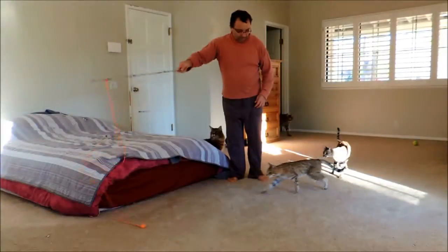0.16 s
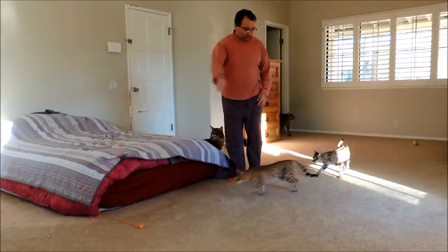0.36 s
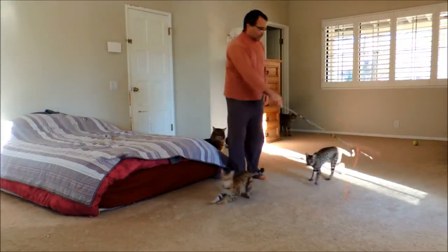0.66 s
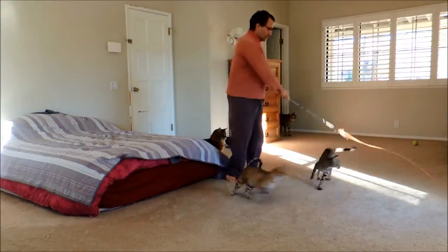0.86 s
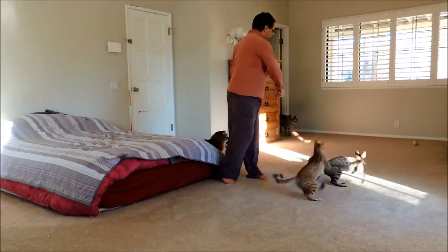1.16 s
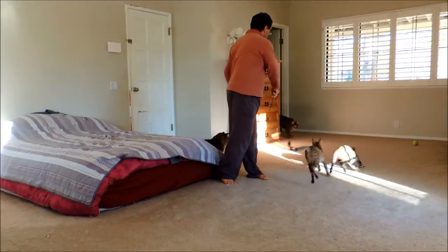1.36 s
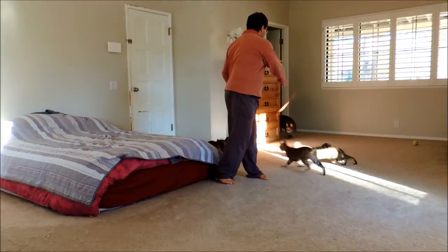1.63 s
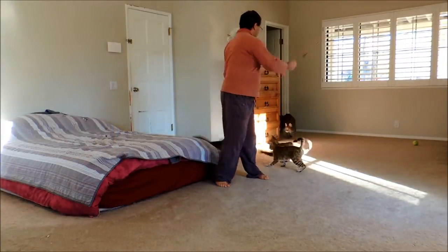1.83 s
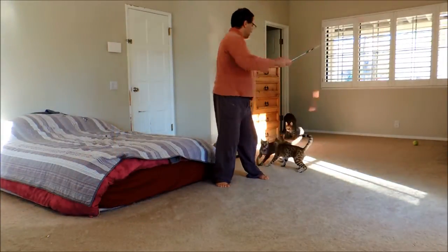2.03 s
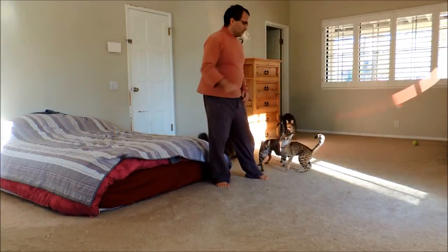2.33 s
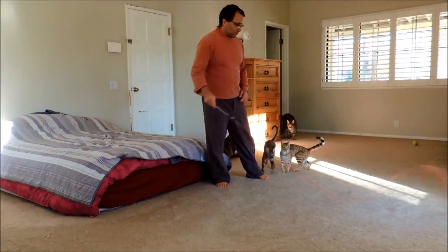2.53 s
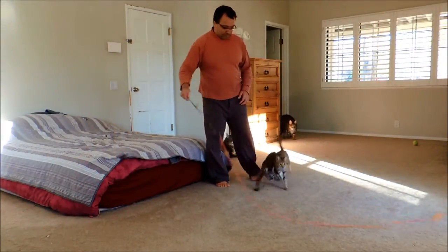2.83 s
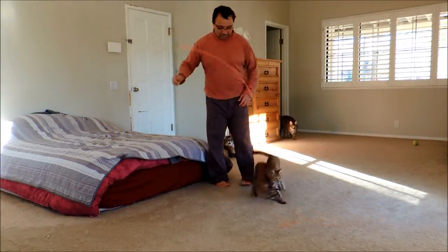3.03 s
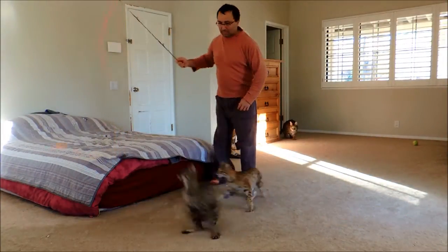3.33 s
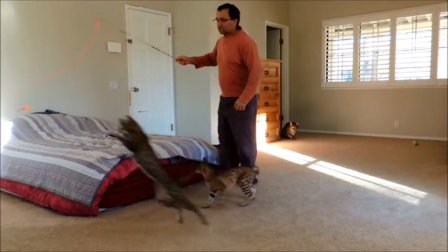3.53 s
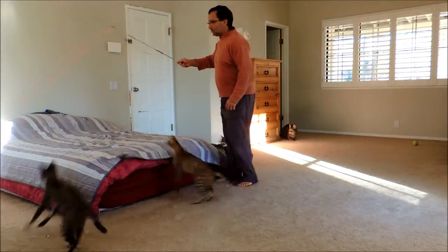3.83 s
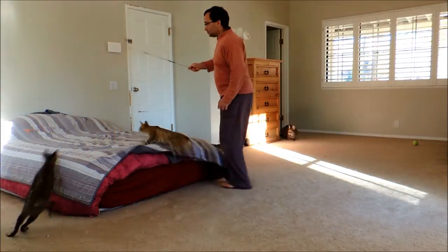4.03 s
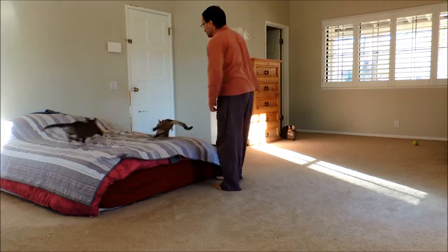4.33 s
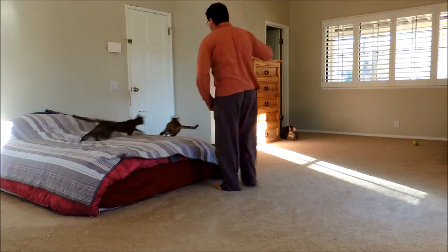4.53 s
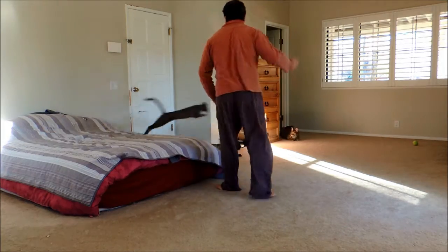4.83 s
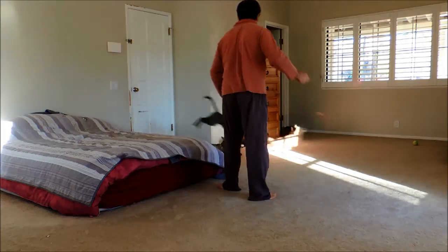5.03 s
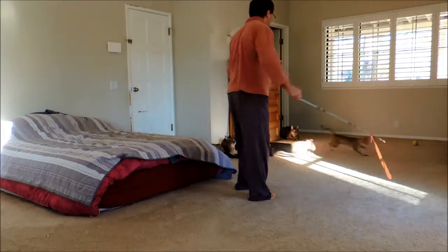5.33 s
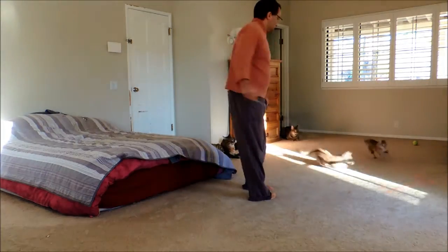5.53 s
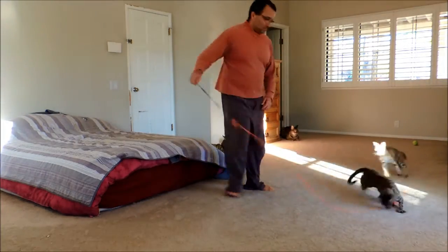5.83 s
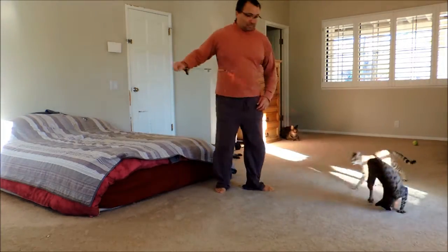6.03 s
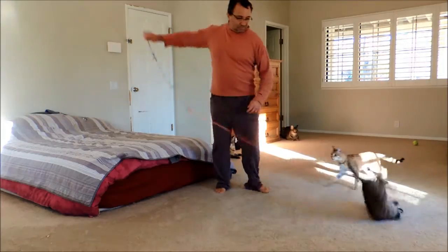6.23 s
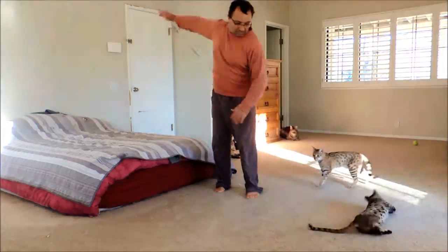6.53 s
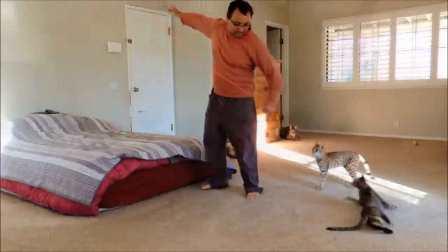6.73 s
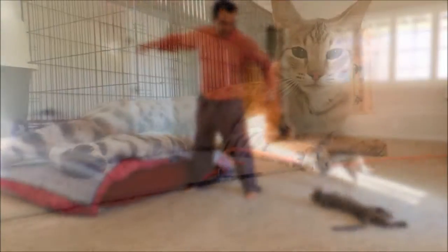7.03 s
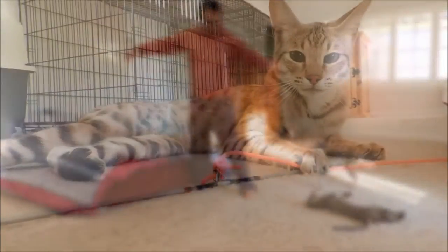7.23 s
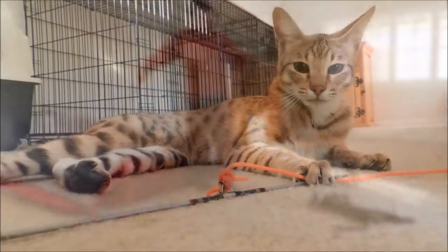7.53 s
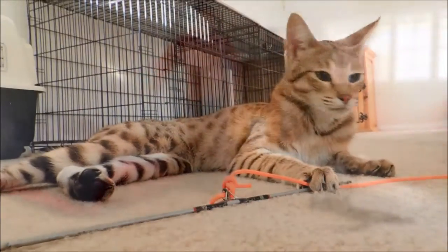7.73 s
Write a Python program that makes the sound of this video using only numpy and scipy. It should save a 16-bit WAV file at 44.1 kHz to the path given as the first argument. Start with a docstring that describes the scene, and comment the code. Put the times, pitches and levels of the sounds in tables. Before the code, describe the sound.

Muffled paw thuds, quick claw scratches and low mattress bumps as cats chase a toy around a bare-walled, hissy room.

```python
"""Cats chase a toy across a carpeted bedroom, some metres from a small stereo camera that hisses throughout.
Soft paw thumps on the wooden floor grow firmer near 0.9 s; claws tick, threads twang, claws and fur scuff the pile.
After a lull at 2 s the chase returns; from 4.2 s a mattress booms under pushes and drops. The hardest thump is at
5.1 s, the strongest scuff near 5.9 s; treble hiss swells at 6.8 s and a few last steps follow. Short ringing bursts
make thumps, twangs, claw drags and mattress drops; shaped noise makes ticks, grit, rustle, pushes and hiss;
bare walls echo paws, claws and scuffs."""
import sys
import numpy as np
from scipy import signal
from scipy.fft import rfft, irfft, next_fast_len
from scipy.io import wavfile

SR = 44100
rng = np.random.default_rng(int(sys.argv[2]) if len(sys.argv) > 2 else 0)


def generate_wav(sig):
    """Save sig (samples, or channels by samples) to the path in sys.argv[1] as 16-bit PCM at SR."""
    pcm = np.round(np.clip(np.atleast_2d(sig).T, -1, 1) * 32767).astype(np.int16)
    wavfile.write(sys.argv[1], SR, pcm)


N = 347528  # length in samples


def paws():
    """Each padded paw makes the boards ring for a few cycles; weight adds a deep boom, toes add small knocks."""
    # paw landings, levels before panning and echo: start_s, peak_db, floor_pitch_hz,
    # knock_db and boom_db (both relative to the thump), ring_cycles
    landings = [(0.292, -47, 172, -22, -17, 1.9), (0.486, -47, 186, -3, -19, 1.2),
                (0.582, -48, 194, -4.5, -18, 2.1), (0.64, -48.5, 199, -5, -24, 2.4),
                (0.669, -48, 188, 0, -18, 2), (0.745, -48, 196, -4, -14, 1.9),
                (0.914, -36.5, 294, -9, -24, 1.65), (0.929, -39.5, 395, -19, -23, 2.5),
                (1.11, -45, 198, -6, -20, 1.9), (1.175, -35, 211, -10, -28, 1.8),
                (1.259, -36, 210, -9, -6, 1.5), (1.331, -39.5, 249, -8, -20, 2),
                (1.358, -42.5, 230, -14, -18, 1.7), (1.476, -37.5, 227, -16, -24, 2.2),
                (1.51, -37.5, 223, -10, -9, 1.7), (1.587, -34, 204, -9.5, -16, 1.2),
                (1.639, -37, 222, -6, -10, 1.5), (1.788, -36.5, 272, -12, -17, 2.5),
                (1.871, -45, 218, -7, 4, 1.9), (1.908, -23, 272, -11, -12, 1.76),
                (1.939, -30, 213, -12, -19, 1.3), (1.962, -35.5, 196, -17, -17, 2.1),
                (2.009, -55, 215, -14, -22, 2.1), (2.678, -28.5, 292, -11, -25, 1.3),
                (2.736, -30.5, 278, -12, -34, 1), (2.958, -42, 219.4, -17, -9, 1.9),
                (3.007, -34, 236, -7, -5.5, 1), (3.116, -27, 247, -12, -17, 1.2),
                (3.15, -36, 202, -15, -22, 2.2), (3.189, -22.5, 200, -12, -22, 1.25),
                (3.22, -28.5, 230, -9, -16, 1.2), (3.242, -25.5, 233, -17, -15, 1.3),
                (3.306, -28.5, 306, -9, -24, 2.9), (3.332, -37.5, 221, -20, -24, 2.6),
                (3.44, -31, 306, -8, -33, 2.2), (3.92, -43, 216, -10, -19, 3.1),
                (3.948, -27.5, 300, -18, -29, 1.6), (3.976, -30.5, 224, -5, -22, 1.8),
                (4.03, -34.5, 270, -11, -6, 2.3), (4.071, -37.5, 207, -7, -5.5, 1.7),
                (4.137, -35.5, 151, -6, -14, 1.8), (4.267, -44.5, 199, 1, -8, 1.2),
                (4.402, -34.5, 190, -5.5, -19, 2.2), (4.434, -33, 228, -4.5, -12, 2.4),
                (4.464, -37, 284, -6, -11, 1.4), (4.537, -38.5, 274, -4, -12, 1.7),
                (4.619, -39, 234, -4, -11, 1.9), (4.699, -34, 203, -1, -6, 1.75),
                (5.053, -33.5, 253, -14, -22, 3.5), (5.086, -14.5, 262, -15.5, -39, 2),
                (5.103, -24.5, 214, -11, -34, 3.1), (5.135, -27.5, 352, -11, -19, 2.2),
                (5.189, -31.5, 221, -25, -25, 2.4), (5.366, -36, 234, -10, -30, 2.5),
                (5.518, -35, 225, -11, -9.5, 2.2), (5.619, -36, 250, -7, -22, 2),
                (5.641, -30.5, 240, -4.5, -15, 1.5), (5.75, -27.5, 209, -5.5, -25, 1.9),
                (5.772, -25.5, 226, -13, -25, 1.5), (5.829, -27, 198, -3, -9, 3.1),
                (5.869, -21, 301, -7, -24, 2.2), (5.885, -21, 372, -15, -25, 2),
                (5.901, -25.5, 370, -13, -10.5, 1.4), (5.947, -24.5, 354, -8, -21, 1.5),
                (6.015, -27.5, 342, -20, -24, 0.91), (6.058, -40, 231, -18, -20, 1.7),
                (6.089, -42.5, 196, -15, -17, 1.5), (6.425, -40.5, 199, 0, -12, 1.7),
                (6.579, -43, 388, -13, -14, 1.3), (6.851, -29, 207, -14, -19, 1.44),
                (6.894, -36.5, 190, -6, -8, 1.7), (7.084, -43, 186, -12, -20, 1.7),
                (7.645, -40, 312, -19, -25, 1.6), (7.677, -43, 395, -17, -16, 2.3),
                (7.783, -40.5, 258, -6.5, -25, 1.9)]
    out = np.zeros(N)
    chances = rng.random((len(landings), 14))
    for (start_s, db, hz, knock_db, boom_db, cycles), chance in zip(landings, chances):
        thump = burst(hz, max(cycles, 0.7), phase=chance[0], rise=0.21)
        add(out, start_s, undb(db) * thump)
        boom = burst(126.0, cycles=1.3, phase=chance[1])
        add(out, start_s, undb(db + boom_db) * boom)
        # four toe knocks, 300 to 514 Hz, weaker the later they come
        for late, size, phase in chance[2:].reshape(4, 3):
            knock = np.exp(-1.2 * late) * burst(300 * 1.714 ** size, cycles=2.7, phase=phase, rise=0.39)
            add(out, start_s + 0.0019 + 0.025 * late, undb(db + knock_db) * knock)
    return side_gains(np.arange(N) / SR) * out


def ticks():
    """A claw snaps free or scratches: fading noise rings a fibre, giving a gritty click."""
    # claw ticks and sudden scratches, levels before panning:
    # start_s, peak_db, pitch_hz, fade_s (of the noise), left_minus_right_db
    claw_ticks = [(1.267, -35.5, 3200, 0.004, .5), (1.643, -37, 2650, 0.0029, -9),
                  (3.236, -33, 2580, 0.012, -3), (4.291, -38, 3830, .005, .5),
                  (4.563, -37, 3020, 0.0056, -1), (5.622, -41, 2450, 0.0065, -1),
                  (5.645, -46, 2830, .005, -2), (5.879, -19.5, 4600, 0.0022, -5),
                  (6.474, -30.5, 5300, .005, -4), (6.587, -34.5, 2690, 0.0023, -7),
                  (6.646, -33.5, 5300, 0.097, 6), (7.476, -38, 8000, .004, 11),
                  (7.483, -35, 6500, 0.0047, 12), (7.599, -39, 5920, .003, 9)]
    out = np.zeros((2, N))
    t = np.arange(SR // 8) / SR
    noises = rng.standard_normal((len(claw_ticks), len(t)))
    for (start_s, db, hz, fade_s, left_right_db), noise in zip(claw_ticks, noises):
        fibre = signal.iirpeak(hz, 0.7, SR)
        snap = signal.lfilter(*fibre, noise * np.exp(-t / fade_s))
        snap = signal.lfilter(*fibre, snap)  # a second pass narrows the pitch
        snap = undb(db) * snap / np.abs(snap).max()
        add(out, start_s, np.outer(pan(left_right_db), snap))
    return out


def twangs():
    """A claw catches a thread or the toy's cord, which rings on for a few cycles."""
    # caught threads, levels before panning: start_s, peak_db, pitch_hz
    caught_threads = [(1.269, -38, 1260), (1.272, -43, 1620), (1.603, -36.5, 950), (1.643, -45, 1360),
                      (1.646, -41, 2600), (1.659, -37, 780), (1.69, -42, 1290), (1.914, -37.5, 783),
                      (1.956, -44, 1720), (2.683, -40, 576), (2.685, -53, 1100), (3.197, -36.5, 604),
                      (3.241, -36, 1020), (3.245, -39, 1790), (4.026, -39, 1030), (4.556, -41, 1130),
                      (5.088, -38, 622), (5.62, -44, 1320), (5.648, -37, 1290), (5.852, -30, 1026),
                      (5.864, -23, 1036), (5.893, -34, 1260), (6.453, -40, 1960), (6.692, -39, 2700),
                      (6.956, -37.5, 1520)]
    out = np.zeros((2, N))
    for (start_s, db, hz), phase in zip(caught_threads, rng.random(len(caught_threads))):
        twang = undb(db) * burst(hz, cycles=7.2, phase=phase, rise=0.04)
        add(out, start_s, np.outer(side_gains(start_s), twang))
    return out


def scuffs():
    """Claws pluck carpet loops in short pitched grains; pile and fur crackle densely above them."""
    # slides on carpet and blanket, levels before panning: centre_s, swell_s, fade_s,
    # drag_db (claws), drag_pitch_hz, grit_db (pile), rustle_db (fur)
    slides = [(.57, .08, 0.12, -64, 850, -59, -62), (1.268, 0.0087, 0.06, -51, 1190, -63, -53),
              (1.575, 0.016, 0.061, -49, 1050, -52.5, -56), (1.644, 0.014, 0.043, -42, 845, -45, -47),
              (1.912, 0.011, .02, -46.5, 820, -52, -58), (1.965, 0.017, 0.042, -51.5, 870, -56.5, -65),
              (2.06, .05, 0.058, -75, 850, -67, -54), (2.46, 0.045, 0.064, -89, 1040, -64, -60),
              (2.685, 0.0034, .025, -49, 710, -67, -68), (2.745, 0.016, 0.049, -50.5, 636, -63, -69),
              (2.92, 0.067, 0.085, -61.5, 1060, -62, -56.5), (3.14, 0.016, 0.067, -58, 700, -58.5, -68),
              (3.241, 0.012, 0.032, -39, 950, -47, -66), (3.35, 0.033, 0.045, -52, 1040, -51, -62),
              (3.44, 0.056, 0.053, -48.5, 860, -51, -45), (3.93, 0.061, 0.079, -59, 1120, -60, -52.5),
              (4.04, 0.016, .04, -49.5, 1040, -60, -55), (4.15, .04, 0.052, -54, 930, -54, -54),
              (4.3, 0.025, 0.013, -52.5, 880, -49.5, -47.5), (4.48, 0.056, 0.013, -50, 1000, -55, -68),
              (4.53, .012, .012, -64, 960, -64, -45.5), (4.565, 0.015, .04, -48, 880, -50, -45.5),
              (4.74, 0.05, 0.018, -48, 960, -54, -53), (4.81, 0.063, 0.035, -50.5, 870, -44.5, -44),
              (5.04, .04, 0.026, -60, 1000, -70, -52), (5.092, 0.007, 0.081, -46, 697, -51.5, -56),
              (5.31, .04, 0.048, -64, 1030, -57, -53), (5.4, 0.047, 0.074, -60, 870, -54, -53),
              (5.621, 0.0078, 0.055, -42, 1040, -47, -57), (5.7, .03, 0.076, -53.5, 1340, -65, -54),
              (5.882, 0.032, 0.054, -33.5, 970, -38, -38), (6.02, .04, 0.052, -54, 880, -65, -54),
              (6.105, 0.033, .01, -77, 888, -56, -50), (6.262, .008, .03, -70, 870, -61, -56),
              (6.44, 0.048, 0.032, -51, 1070, -50.5, -51), (6.48, 0.031, 0.035, -53, 1100, -66, -45),
              (6.58, 0.023, 0.037, -49, 1040, -52, -50), (6.66, 0.015, 0.038, -52.5, 1220, -44.5, -44),
              (6.72, 0.023, 0.025, -59, 1250, -43, -41.5), (6.77, .015, 0.043, -62, 870, -73, -45),
              (6.93, 0.057, 0.076, -56, 1040, -54, -46.5), (7.03, 0.034, 0.041, -56.5, 895, -58, -64),
              (7.48, 0.018, 0.021, -59.5, 990, -55, -52), (7.61, 0.061, 0.16, -59, 900, -59, -58)]
    # tone of the carpet pile, only its shape counts: pitch_hz, level_db (per Hz)
    grit_tone = [(900, -9), (1800, 1), (2600, 1.5), (4000, -7), (6000, -10)]
    # tone of the fur, only its shape counts: pitch_hz, level_db (per Hz)
    rustle_tone = [(2500, -5.5), (4200, -7), (5300, -4), (8000, -6), (14000, -9.5)]
    # faint shuffling under the slides: levels of drag, grit and rustle, and drag pitch
    shuffle_db, shuffle_hz = (-68.5, -66, -64), 910

    power = np.outer(undb(shuffle_db) ** 2, np.ones(N)).astype(np.float32)
    weighted_hz = shuffle_hz * power[0]  # the loudest slide sets the drag pitch
    for centre_s, swell_s, fade_s, drag_db, hz, grit_db, rustle_db in slides:
        levels = np.float32(undb([drag_db, grit_db, rustle_db]) ** 2)
        slide = np.outer(levels, swell(centre_s, swell_s, fade_s))
        power = power + slide
        weighted_hz = weighted_hz + hz * slide[0]
    drag_hz = weighted_hz / power[0]
    gain = np.sqrt(power)

    drag = np.zeros(N)
    for when, size, force, phase in rng.random((5000, 4)):
        hz = drag_hz[int(when * N)] * 2.72 ** (size - 0.4)  # loops of many sizes
        grain = burst(hz, cycles=2.6, phase=phase)
        add(drag, when * (N - 1) / SR, (1 - force) ** -0.2 * grain)  # a few plucks are stronger
    grit = crackle(grit_tone, spread_db=3.0, shared=0.38) * gain[1]
    rustle = crackle(rustle_tone, spread_db=3.0, shared=0.29) * gain[2]
    return side_gains(np.arange(N) / SR) * (unit(drag) * gain[0] + grit + rustle)


def crackle(tone, spread_db, shared):
    """Dense fibre clicks of uneven size, partly alike at both ports."""
    uneven = undb(spread_db * np.minimum(rng.exponential(size=N), 6.0))
    fibres = rng.standard_normal((3, N)) * uneven
    both, left, right = (unit(colour(fibre, tone)) for fibre in fibres)
    return shared * both + np.sqrt(1 - shared ** 2) * np.array([left, right])


def bed():
    """Soft uneven pushes shake the slow modes of mattress and frame; a few drops stand out."""
    # paws pushing into the mattress, levels before panning: centre_s, level_db
    mattress_pushes = [(4.172, -48), (4.29, -41.5), (4.47, -35.5), (4.568, -39), (4.63, -40), (4.724, -36),
                       (4.82, -39), (4.9, -53), (5.002, -52), (5.06, -66)]
    # slow modes of mattress and frame: pitch_hz, width_hz, level_db (relative)
    mattress_modes = [(40, 8.1, 7), (85, 11, -18)]
    # full weight dropping on the mattress, levels before panning: start_s, peak_db, pitch_hz
    mattress_drops = [(4.553, -40, 70), (4.717, -27.5, 94.5), (4.751, -32.5, 90)]
    low_band = signal.butter(3, [33, 130], "band", fs=SR, output="sos")
    shaking = signal.sosfilt(low_band, rng.standard_normal(N))
    boom = np.zeros(N)
    for hz, width_hz, db in mattress_modes:
        mode = signal.lfilter(*signal.iirpeak(hz, hz / width_hz, SR), shaking)
        boom += undb(db) * unit(mode)
    power = sum(undb(db) ** 2 * swell(s, swell_s=0.033, fade_s=0.061) for s, db in mattress_pushes)
    boom = unit(boom) * np.sqrt(power)
    for (start_s, db, hz), phase in zip(mattress_drops, rng.random(len(mattress_drops))):
        add(boom, start_s, undb(db) * burst(hz, cycles=1.25, phase=phase))
    return boom * pan(-1.9)[:, None]


def room(dry, hop=SR // 4):
    """The cats keep moving, so each overlapping half second meets the walls with a new echo pattern."""
    out = dry.copy()
    mono = dry.mean(axis=0)
    for first in range(-hop, N, hop):
        k = np.arange(max(first, 0), min(first + 2 * hop, N))
        piece = mono[k] * np.sin(np.pi * (k - first) / (2 * hop))  # fades in and out
        wet = signal.fftconvolve(piece[None], echoes(), axes=1)
        add(out, (k[0] + 0.5) / SR, wet)
    return out


def echoes(first_s=0.006):
    """Scattered wall echoes that thicken, then fade at each band's own rate; bass arrives most alike at both ports."""
    # how the walls echo each band: pitch_hz, t60_s (time to fade by 60 dB), echo_db (before scaling)
    wall_bands = [(215, 0.59, 1.5), (770, 0.18, -21.5), (2870, 0.72, -6), (9900, 0.4, -21.5)]
    t = np.arange(int(0.7 * SR)) / SR
    density = np.minimum(0.012 + 0.4 * t, 1)
    present = rng.random(len(t)) < density
    hits = rng.standard_normal((2, len(t))) * present / np.sqrt(density) * (t > first_s)
    tail = 0
    for hz, t60_s, db in wall_bands:
        low_hz = 30 if hz < 300 else hz / 2
        high_hz = min(2 * hz, 15000)
        band_filter = signal.butter(1, [low_hz, high_hz], "band", fs=SR, output="sos")
        band = signal.sosfilt(band_filter, hits) * 1000 ** (-t / t60_s)
        band *= undb(db) / np.sqrt(t60_s * SR / 14)  # evens out long and short tails
        difference = min(0.1 * hz / 200, 1) * band[1]
        tail = tail + band[0] + difference * np.array([[1], [-1]])
    return tail


def hiss():
    """Slowly rising microphone hiss and still-room rumble, most alike left and right in the bass, plus bright hiss."""
    # tone of hiss and rumble, only its shape counts: pitch_hz, level_db (per Hz)
    still_tone = [(12, -66), (20, 5.5), (86, -6.5), (202, -4.5), (1150, -14), (1280, -14), (3460, -19),
                  (12600, -23), (14500, -23)]
    # loudness of hiss and rumble before panning: time_s, level_db
    still_level = [(0, -51), (2.3, -51), (3.7, -50.5), (6.2, -48), (7.2, -47.5), (7.88, -47.5)]
    # likeness of left and right: pitch_hz, likeness (1 = same; below 0 counts as 0)
    still_alike = [(60, 0.66), (130, 0.79), (290, 0.52), (630, 0.32), (1380, -0.69), (3030, -0.58),
                   (6640, 0.21), (14600, 0.11)]
    # tone of the bright hiss, only its shape counts: pitch_hz, level_db (per Hz)
    bright_tone = [(2500, -31), (4600, 2), (9000, 2), (14500, -4)]
    # loudness of the bright hiss before panning: time_s, level_db
    bright_level = [(0, -90), (6.0, -89), (6.8, -49.5), (7.3, -55), (7.88, -72)]
    size = next_fast_len(N)
    alike = np.clip(on_hz(still_alike, np.arange(size // 2 + 1) * SR / size), 0, 1)
    common = rfft(colour(rng.standard_normal(N), still_tone), size) * np.sqrt(1 + alike)
    opposite = rfft(colour(rng.standard_normal(N), still_tone), size) * np.sqrt(1 - alike)
    still = irfft(np.array([common + opposite, common - opposite]), size)[:, :N]
    still = unit(still) * undb(in_time(still_level)[0])
    bright = unit(colour(rng.standard_normal((2, N)), bright_tone))
    bright = bright * undb(in_time(bright_level)[0])
    return (still + bright) * pan(0.27)[:, None]


def undb(db):
    """Turn decibels into a plain gain."""
    return 10 ** (np.asarray(db) / 20)


def unit(x):
    """Scale a sound to an average (RMS) level of 1."""
    return x / np.sqrt(np.mean(x ** 2))


def on_hz(table, hz):
    """Read a table at any frequency, with even steps per octave."""
    table = np.array(table)
    return np.interp(np.log(hz + 1), np.log(table[:, 0]), table[:, 1])


def in_time(table):
    """Draw each column of a table as a line over the whole scene."""
    s, *columns = np.transpose(table)
    return [np.interp(np.arange(N) / SR, s, column) for column in columns]


def colour(x, table):
    """Shape white noise by a spectrum of (Hz, dB)."""
    size = next_fast_len(N)
    gain = undb(on_hz(table, np.arange(size // 2 + 1) * SR / size))
    return irfft(rfft(x, size) * gain, size)[..., :N]


def pan(db):
    """Left and right gains whose levels differ by db."""
    return undb(np.array([db, -db]) / 2)


def side_gains(s):
    """Left and right gains for a sound made at time s, following the chase."""
    # where the chase is: time_s, left_minus_right_db
    chase_path = [(0, 0.5), (3, 1.5), (4.3, 1.2), (5.2, 2), (6.4, 1.2), (6.7, 9), (7, 1), (7.88, 2)]
    return pan(np.interp(s, *np.transpose(chase_path)))


def add(out, s, wave):
    """Mix a wave into out from time s, cut off at the end."""
    i = int(s * SR)
    n = min(wave.shape[-1], N - i)
    out[..., i:i + n] += wave[..., :n]


def burst(hz, cycles, phase, rise=0.18):
    """A tone that swells and dies within a few cycles, under an envelope of peak 1."""
    u = np.arange(int(6 * cycles * SR / hz)) * hz / SR / cycles
    shape = (1 - np.exp(-u / rise)) ** 2 * np.exp(-u ** 1.22)
    return shape / shape.max() * np.sin(2 * np.pi * (cycles * u + phase))


def swell(s, swell_s, fade_s):
    """Power that grows to 1 at time s and dies away after it, with a rounded top close by."""
    t = np.arange(N, dtype=np.float32) / SR - np.float32(s)
    growing = np.exp(np.clip(-2 * t / swell_s, -40, 40))
    dying = np.exp(np.clip(2 * t / fade_s, -40, 40))
    return 2 / (growing + dying)


def scene():
    """Paws, claws and scuffs echo in the room; mattress and hiss are added without echo."""
    left, right = room(paws() + ticks() + twangs() + scuffs())
    chase = np.array([np.roll(left, 2), right])  # the left port hears 2 samples later
    return chase + bed() + hiss()


def record(dry):
    """The camera cuts the top, steeply above 14270 Hz."""
    return signal.sosfilt(signal.ellip(12, 0.2, 80, 14270, fs=SR, output="sos"), dry)


dry = scene()
out = record(dry)
generate_wav(out)
```